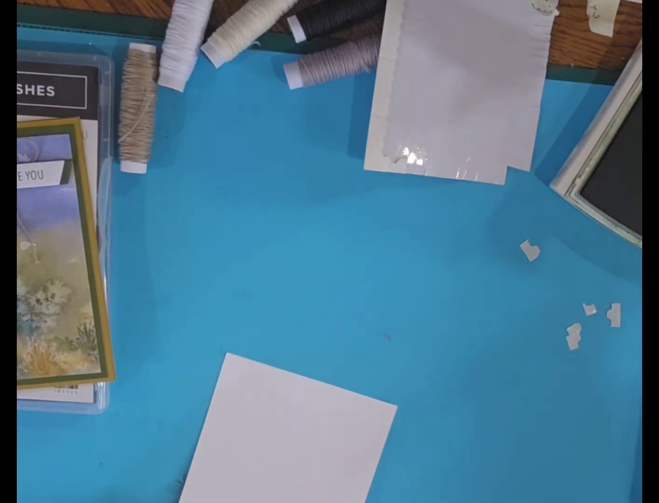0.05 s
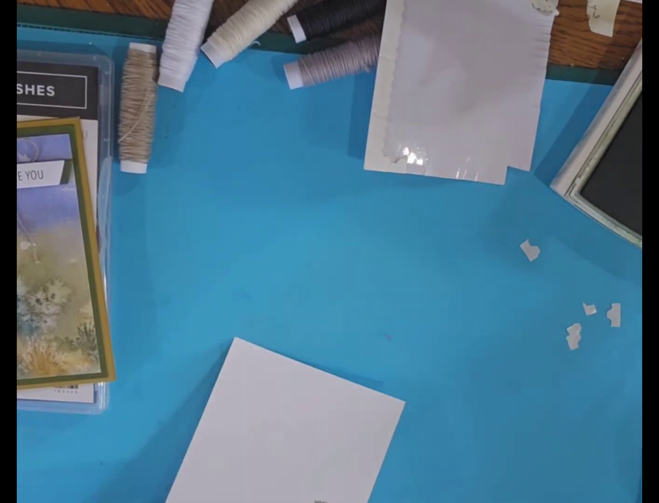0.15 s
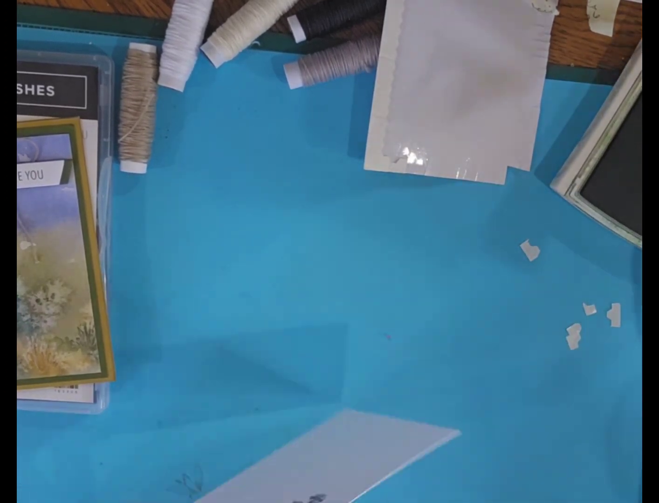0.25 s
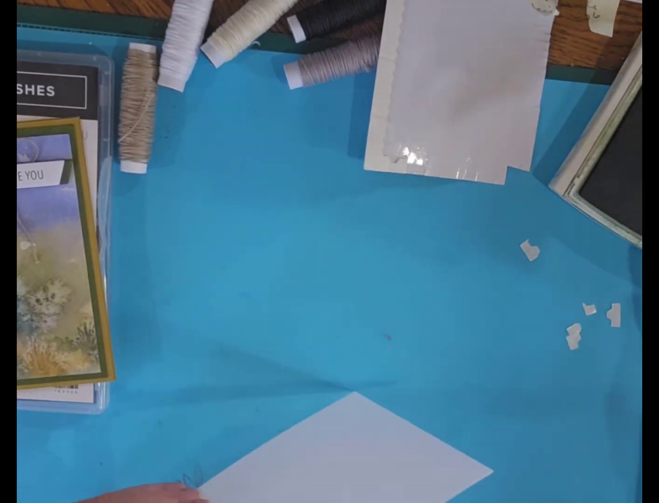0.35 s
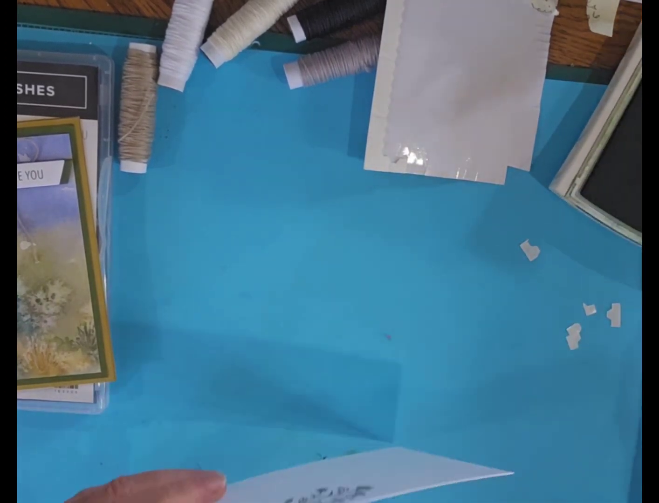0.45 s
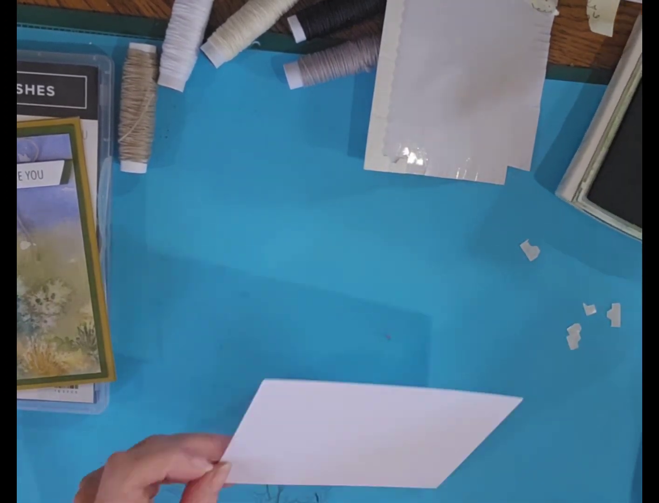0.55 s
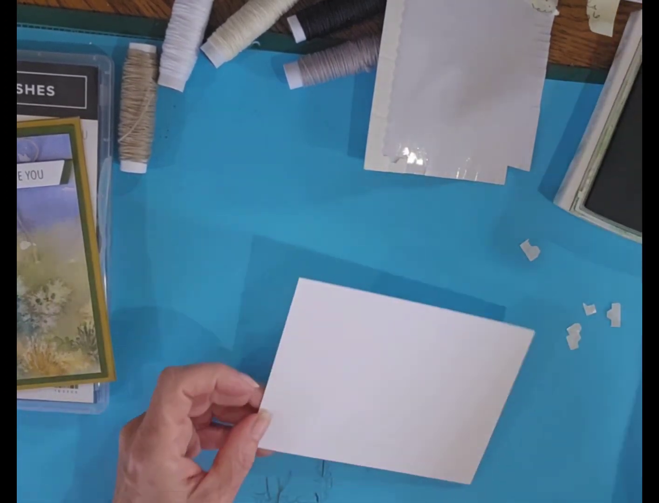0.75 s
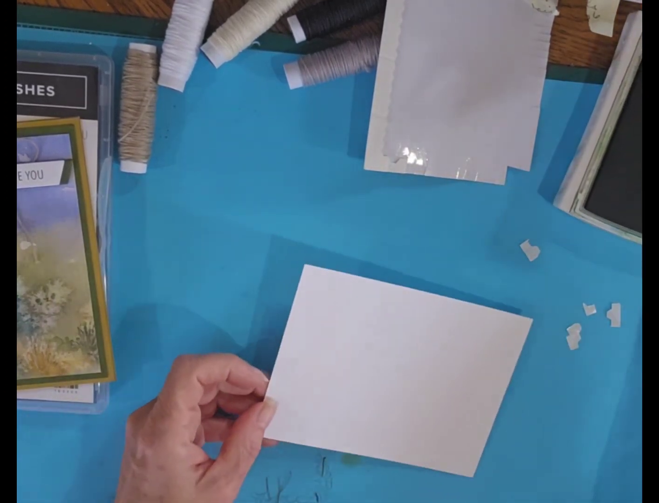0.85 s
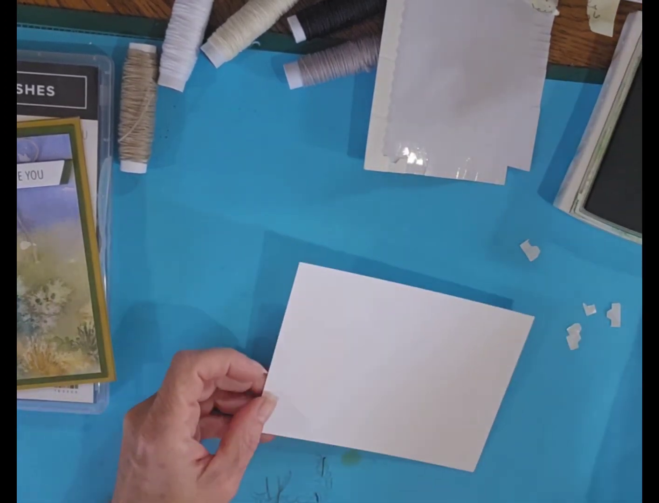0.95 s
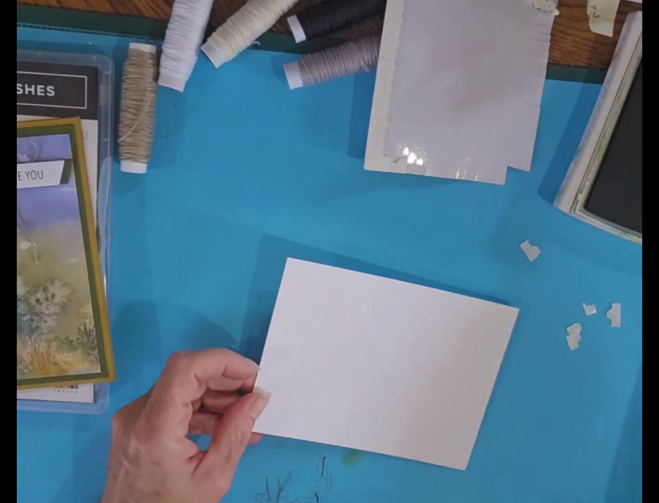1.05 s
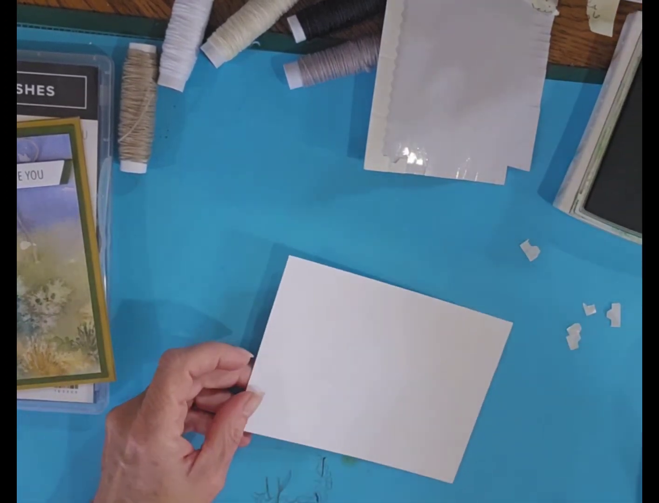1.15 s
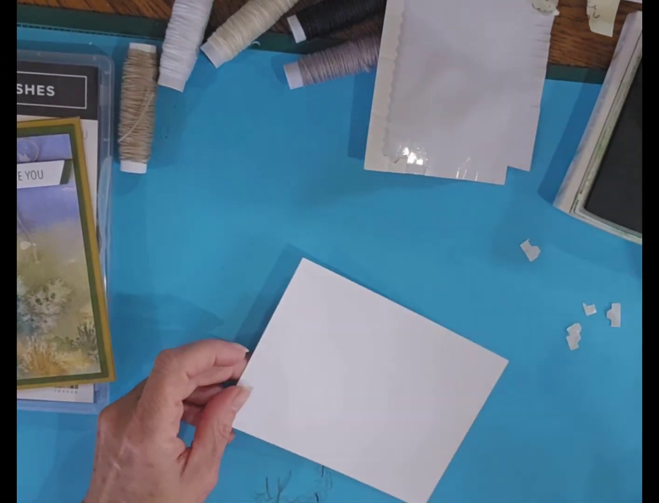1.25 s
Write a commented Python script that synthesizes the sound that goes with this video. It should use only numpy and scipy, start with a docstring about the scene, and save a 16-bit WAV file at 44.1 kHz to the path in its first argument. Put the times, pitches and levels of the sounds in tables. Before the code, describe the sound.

Stiff card slides, bumps and clacks against a tabletop as a hand turns it over.

```python
"""A stiff paper card on a craft mat, close to a stereo microphone in a small quiet room.
First the card hisses softly as it slides off the mat. Fingers flick and pat it as it is turned over,
and hand and card bump the table, which booms in a few low modes. Near 0.45 s the edge clacks down,
then chatters as it drags over the mat. A last faint slide follows at about 1.2 s."""
import sys
import numpy as np
from scipy import signal
from scipy.fft import rfft, irfft
from scipy.io import wavfile
from scipy.ndimage import uniform_filter1d, map_coordinates

SR = 44100
rng = np.random.default_rng(int(sys.argv[2]) if len(sys.argv) > 2 else 0)


def log_audio(samples):
    """Write samples as a 16-bit WAV file to the path given in sys.argv[1]."""
    # one column per channel
    frames = np.atleast_2d(samples).T
    # limit to full scale, then quantise
    limited = np.clip(frames, -1, 1)
    pcm = np.round(limited * 32767).astype(np.int16)
    wavfile.write(sys.argv[1], SR, pcm)


N = 57330
TIME = np.arange(N) / SR
TOP_HZ = 16000


def undb(db):
    return 10 ** (np.asarray(db) / 20)


def on_log(hz, points):
    """Reads (Hz, value) points on a log-frequency axis."""
    p = np.array(points)
    return np.interp(np.log(hz + 1), np.log(p[:, 0]), p[:, 1])


def pan(left_minus_right_db):
    return undb(np.array([[1], [-1]]) * left_minus_right_db / 2)


def unit(x):
    """Scales to a mean energy of 1 per channel."""
    return x / np.sqrt(np.mean(np.sum(x ** 2, axis=-1)))


def response(db_at, size=1024):
    """Minimum-phase impulse response of a dB-over-frequency curve."""
    cepstrum = irfft(np.log(undb(db_at(np.arange(size // 2 + 1) * SR / size))))
    cepstrum[1:size // 2] *= 2
    cepstrum[size // 2 + 1:] = 0
    return irfft(np.exp(rfft(cepstrum)))[None]


def through(x, impulse):
    return signal.fftconvolve(x, impulse, axes=-1)[:, :x.shape[1]]


def highpass(order, hz):
    return signal.butter(order, hz, "high", fs=SR, output="sos")


def noise(size, wide_hz=4200):
    """Stereo noise, alike in the bass and unrelated in the treble."""
    mid, side = rfft(rng.standard_normal((2, size)))
    hz = np.arange(len(mid)) * SR / size
    apart = hz / np.hypot(hz, wide_hz)
    return irfft((mid + np.array([[1], [-1]]) * apart * side) / np.sqrt(1 + apart ** 2), size)


def hiss(colour):
    """Steady coloured noise of rms 1."""
    return unit(through(noise(N), response(lambda hz: on_log(hz, colour)))) * np.sqrt(N)


def scuff(decay_ms, db_at, attack_s=.0012, size=4096):
    """A brief burst of tiny contacts with the given colour."""
    t = TIME[:size]
    shape = (1 - np.exp(-t / attack_s)) * np.exp(-t * 1000 / decay_ms)
    return unit(through(noise(size) * shape, response(db_at)))


def add_hit(out, start, db, hit, mean_s=.005):
    """Mixes in a unit-energy hit; db is its level averaged over mean_s."""
    i = int(start * SR)
    out[:, i:i + hit.shape[1]] += undb(db) * np.sqrt(mean_s * SR) * hit[:, :N - i]


def ringing(modes):
    """Sum of decaying sines."""
    return sum(undb(db) * np.sin(2 * np.pi * hz * TIME) * np.exp(-np.log(1000) * TIME / t60)
               for hz, db, t60 in modes)[None]


# The quiet at the microphone. Each row: frequency in Hz, relative level in dB.
BACKGROUND_COLOUR = [(30, -15.5), (150, -3.5), (330, 6), (700, -12.5), (2000, -13.5), (3500, -12.5),
                     (6000, -6), (9000, -10), (12000, -21.5), (16000, -25.5)]


def background():
    """A very faint, steady hiss under everything."""
    return undb(-78) * hiss(BACKGROUND_COLOUR)


# The small room around the table. Each row: frequency in Hz, time to fall 60 dB in seconds.
ROOM_DECAY = [(200, 0.5), (1000, 0.33), (3000, 0.26), (8000, .33), (15000, 0.12)]


def room(dry, tail_db, bands=9):
    """Adds the room's tail, which dies sooner in the treble."""
    hz = np.arange(N // 2 + 1) * SR / N
    spectrum, centres = rfft(noise(N)), np.geomspace(100, TOP_HZ, bands)
    tail = 0
    for centre, weights in zip(centres, np.eye(bands)):
        band = irfft(spectrum * on_log(hz, np.c_[centres, weights]), N)
        tail += band * np.exp(-np.log(1000) * TIME / on_log(centre, ROOM_DECAY))
    build_up = 1 - np.exp(-TIME / .006)
    return dry + undb(tail_db) * through(dry, unit(tail * build_up))


# The card sliding, left of the microphone.
# Each row: start in seconds, length in seconds, hiss level in dB, rub level in dB.
SLIDES = [(-.02, .035, -70, -111), (0.032, 0.068, -71, -111), (0.09, 0.037, -56.5, -80),
          (0.118, 0.036, -61, -68), (0.169, 0.022, -64, -70.5), (0.201, 0.044, -57.5, -68.5),
          (1.176, 0.046, -61.5, -74), (1.221, 0.045, -63, -66.5), (1.262, 0.018, -69.5, -65),
          (1.287, .03, -72, -65)]
# The hiss and the rub from close by. Each row: frequency in Hz, relative level in dB.
FIBRE_COLOUR = [(200, -33), (950, -30.5), (2380, -27), (3500, -19.5), (5000, -3), (7600, 0), (9900, -5.5),
                (11300, -32.5), (13000, -9.5), (16000, -16)]
RUB_COLOUR = [(200, -36.5), (1100, -18.5), (1400, -9), (2400, -1.5), (3000, -8), (5000, -10.5),
              (9000, -31.5)]


def slides(attack_s=.017, release_s=.022, swell_s=.064, grain_hz=278, rough_db=.5):
    """Paper fibres drag over the mat: a grainy hiss, with a lower rub where the card presses harder."""
    hiss_level = rub_level = 0
    for start, length, hiss_db, rub_db in SLIDES:
        rise = np.clip((TIME - start) / attack_s, 0, 1)
        speed = rise * np.exp(-np.maximum(TIME - start - length, 0) / release_s)
        hiss_level = np.hypot(hiss_level, undb(hiss_db) * speed)
        rub_level = np.hypot(rub_level, undb(rub_db) * speed)
    grain = np.interp(TIME * grain_hz, np.arange(N), rng.standard_normal(N))
    fibres = hiss(FIBRE_COLOUR)
    finest = signal.sosfiltfilt(highpass(4, 10500), fibres)
    # The finest hiss builds up only as the card gathers speed.
    step = 1 / (swell_s * SR)
    swell = signal.lfilter([step], [1, step - 1], hiss_level) * undb(2.5)
    friction = (fibres - finest) * hiss_level + finest * swell + hiss(RUB_COLOUR) * rub_level
    return friction * undb(rough_db * grain) * pan(5)


# Fingertips on the paper, close up.
# Each row: start in seconds, relative level in dB, pitch in Hz, decay in milliseconds.
FLICKS = [(.2390, -34.5, 4900, 1), (0.261, -52.5, 8000, 3.5), (0.279, -41, 5000, 1.1),
          (.3100, -57, 5000, 1.5), (0.352, -58, 9000, 2.5), (0.643, -51.5, 7500, 6), (.8800, -44, 4940, .6),
          (1.016, -62.5, 5930, 0.96)]


def flicks(octave_fall_db=20):
    """Bright ticks as the paper slips off a fingertip."""
    out = np.zeros((2, N))
    for start, db, pitch, ms in FLICKS:
        tick = scuff(ms, lambda hz: -np.minimum(octave_fall_db * abs(np.log2((hz + 1) / pitch)) ** 3, 44))
        add_hit(out, start, db, tick)
    return room(out * undb(-3), tail_db=-9.5)


# Pats on the mat in front of the microphone. Each row: start in seconds, relative level in dB.
PATS = [(.2398, -26.5), (.2792, -33.5), (.3100, -37.5), (.3325, -42), (0.364, -42), (.4915, -37.5),
        (0.527, -45), (.6000, -38), (0.559, -34.5), (.6405, -30), (.8830, -46)]
# Their dull tone. Each row: frequency in Hz, relative level in dB.
PAT_COLOUR = [(40, -15.5), (150, -6.5), (400, -2.5), (600, -4), (830, -4.5), (950, 2), (1100, -8),
              (1400, -11.5), (1800, -10), (2800, -23.5), (8000, -42)]


def pats(decay_ms=6.8):
    """Fingers and the flat of the card land softly on the mat."""
    out = np.zeros((2, N))
    for start, db in PATS:
        add_hit(out, start, db, scuff(decay_ms, lambda hz: on_log(hz, PAT_COLOUR)))
    return room(out * undb(-6), tail_db=-2.5)


# Hand and card bumping the table, near the microphone.
# Each row: start in seconds, relative level in dB, contact time in milliseconds.
BUMPS = [(.2400, -17, 2.88), (0.279, -20, 3.8), (.3240, -20.5, 4.1), (0.411, -25, 3.4), (.4470, -21, 1.2),
         (0.464, -42, 1.1), (0.4924, -37.5, 1.5), (.5580, -36, 1.3), (.6400, -23.5, 2.16),
         (.6740, -23, 3.32), (.6900, -28.5, 2.5), (.7540, -38, 3.1), (0.909, -45, 2.97),
         (.9630, -45.5, 3.4), (1.019, -52.5, 2.66)]
# The table's modes. Each row: frequency in Hz, relative level in dB, time to fall 60 dB in seconds.
TABLE_MODES = [(77, -16.5, 0.33), (131.24, -3.5, 0.5), (148.7, -1, .36), (161.84, 0, 0.47),
               (203.76, 1.5, 0.22), (225, -6.5, 0.32), (276.4, -17, 0.6), (281.2, -6.5, 0.2),
               (332.2, -15, 0.9), (408, -21.5, 0.13), (496, -22, .22)]


def table_boom(bass_cut_hz=149):
    """Each bump is a short push on the table top; a softer one reaches only the lowest modes."""
    push = np.zeros((1, N))
    for start, db, ms in BUMPS:
        contact_s = ms / 1000
        half_sine = np.sin(np.pi * np.clip((TIME - start) / contact_s, 0, 1))
        area = 2 / np.pi * contact_s * SR
        push -= undb(db) * half_sine / area
    vibration = through(push, ringing(TABLE_MODES))
    boom = signal.sosfilt(highpass(3, bass_cut_hz), vibration)  # the deepest bass barely radiates
    return room(boom * undb(-4) * pan(.8), tail_db=-16.5)


# Close to the microphone, the edge clacks as it lands and chatters as it catches on the mat. Each row:
# start in seconds, relative level in dB, tilt above 1 kHz in dB per octave, decay in milliseconds.
CLACKS = [(.3888, -23, -3.5, 8.8), (.4000, -34, -5, 1.8), (.4103, -25, -0.5, 2.8), (.4330, -26, 0, 1.8),
          (.4447, -13, 2, 2.3), (.4490, -13, 0.5, 2.5), (.4555, -22, -3.5, 2), (.4618, -23.5, -3, 2),
          (.4655, -20, 1, 2), (.4700, -21, -0.5, 2.2), (.4790, -32, -2.5, 2.4), (.4910, -23.5, -1, 3.6),
          (.5030, -34.5, -11, 3)]
CHATTER = [(.5260, -30.5, -1.5, 2.7), (.5340, -37.5, 2.5, 5.3), (.5400, -27.5, -0.5, 2.3),
           (.5580, -33.5, -6, 3.5), (.5625, -39.5, -1, 3.2), (.5868, -36, 2.5, 2.9), (.5925, -40, 0, 3.5),
           (.5995, -33, 1.5, 2.8), (.6235, -40, -5, 1.54), (.6405, -37.5, 0, 1.1),
           (.6705, -34.5, -1.5, 1.96), (.6768, -39.5, -1, 5.8), (.6948, -35, -1.5, 1.15),
           (.7042, -38.5, -0.5, 1.43), (.7165, -40, -7, 1.6), (.7248, -42.5, -5, 2.4),
           (.7415, -43, -8, 1.8), (.7770, -65, -20, 3.4), (.8260, -67.5, 2.5, 2.7), (.9080, -50, -9, 4.65),
           (.9625, -49, -11, 4.46)]
# The tone of each. Each row: frequency in Hz, relative level in dB.
CLACK_COLOUR = [(150, -16), (450, -12), (800, -13), (1170, 3), (1550, -9.5), (2000, -2.5), (2700, -13.5),
                (3500, -7), (4500, -18.5), (5400, -9), (6300, -20.5), (7600, -20), (9500, -23),
                (11000, -40.5), (14000, -28.5), (16000, -39.5)]
CHATTER_COLOUR = [(150, -15.5), (600, -11), (850, -16.5), (1100, -0.5), (1500, -9.5), (2050, 2),
                  (2650, -21), (3600, -6), (4400, -22), (5400, -12.5), (6300, -19.5), (8500, -27),
                  (11000, -57), (14000, -45), (16000, -53)]
# What a hard tap sets ringing.
# Each row: frequency in Hz, relative level in dB, time to fall 60 dB in seconds.
TAP_MODES = [(968, -11.5, 0.24), (949, -9, .15), (1049, -1, 0.38), (1097, -1, 0.27), (1116, 3, 0.15),
             (1170, -4, .07), (1405, -5.5, 0.042), (1561, -9, .26), (1988, 0, 0.14), (2202, -9, 0.12),
             (2524, -1, .12), (2720, -2, 0.073), (3110, -9.5, .13), (3230, -1, 0.14), (3200, -10.5, .12),
             (3960, -10.5, .12), (5400, -7.5, 0.092)]
# The edge sits a little to the left. Each row: frequency in Hz, left minus right in dB.
EDGE_PAN = [(500, 4), (1100, -1), (2200, 2.5), (5000, 4), (9000, 5), (13000, 4)]


def card_edge(hits, colour, ring_db, scatter_db, tail_db, full_blow_db=-12, scatter_s=.01):
    """Each contact of the edge scuffs, leaves a short ring and scatters off the things on the table."""
    scuffs, blows = np.zeros((2, N)), np.zeros((1, N))
    for start, db, tilt, ms in hits:
        contact = scuff(ms, lambda hz: on_log(hz, colour) + tilt * np.log2(np.maximum(hz, 1000) / 2000))
        add_hit(scuffs, start, db, contact)
        ring_share_db = .3 * min(db - full_blow_db, 0)  # harder blows put more into the ring
        add_hit(blows, start, db + ring_share_db, np.ones((1, 1)))
    ring = signal.sosfilt(highpass(2, 700), through(blows, unit(ringing(TAP_MODES)))) * undb(ring_db)
    scatter = through(scuffs, unit(noise(N) * np.exp(-TIME / scatter_s))) * undb(scatter_db)
    direction = np.vstack([response(lambda hz: side * on_log(hz, EDGE_PAN) / 2) for side in (1, -1)])
    return room(through(scuffs + ring + scatter, direction) * undb(-4), tail_db)


def scene():
    """The card and the table, heard from close by in the room."""
    landing = card_edge(CLACKS, CLACK_COLOUR, ring_db=-4.5, scatter_db=-11, tail_db=-14)
    dragging = card_edge(CHATTER, CHATTER_COLOUR, ring_db=-5, scatter_db=-8.5, tail_db=-15)
    return table_boom() + landing + dragging + pats() + flicks() + slides() + background()


def record(dry, left_late_s=.00006, bass_hz=257, faint_db=-65.5, window_s=.03, ceiling=.61):
    """The left microphone hears late; the recorder turns down faint bass, rounds peaks, cuts the top."""
    left = map_coordinates(dry[0], [np.arange(N) - left_late_s * SR], mode="mirror")
    pair = np.array([left, dry[1]])
    bass = signal.sosfiltfilt(signal.butter(2, bass_hz, fs=SR, output="sos"), pair)
    bass_power = np.abs(uniform_filter1d(np.mean(bass ** 2, axis=0), int(window_s * SR)))
    gated = pair - .85 * bass / (1 + bass_power / undb(faint_db) ** 2)
    rounded = ceiling * np.tanh(gated / ceiling)
    return signal.sosfilt(signal.ellip(8, .2, 70, TOP_HZ, fs=SR, output="sos"), rounded)


dry = scene()
out = record(dry)
log_audio(out)
```